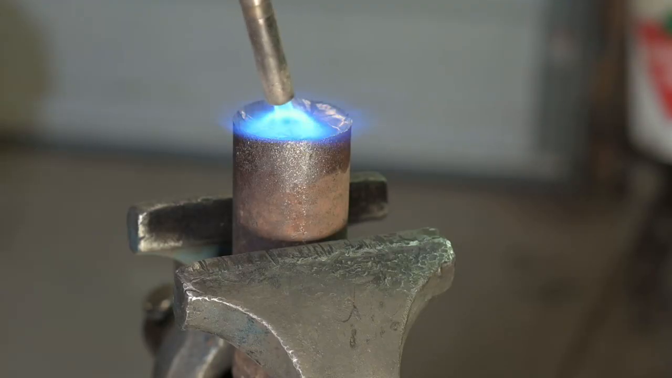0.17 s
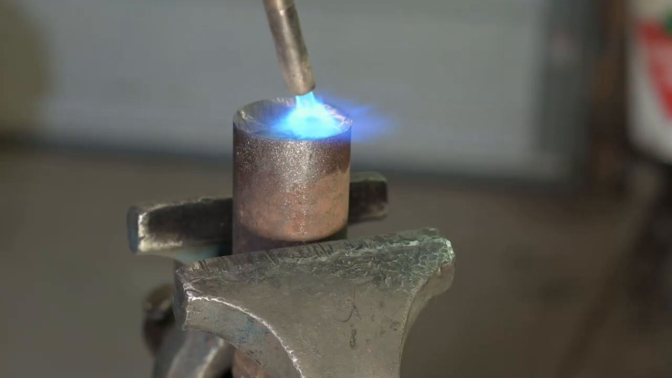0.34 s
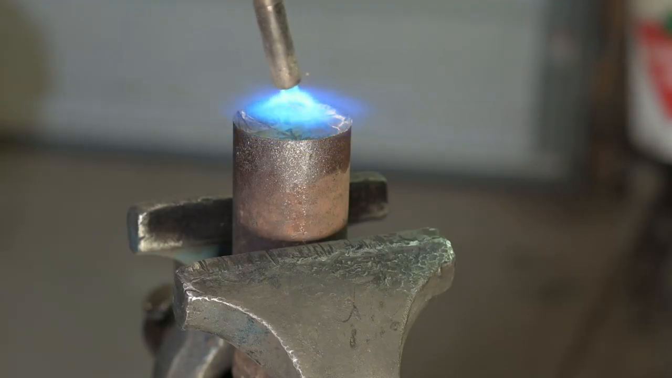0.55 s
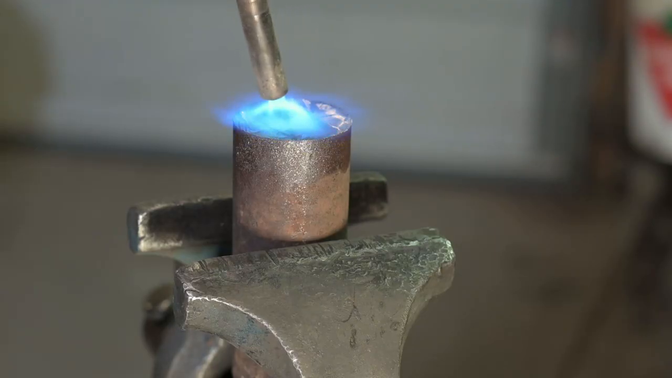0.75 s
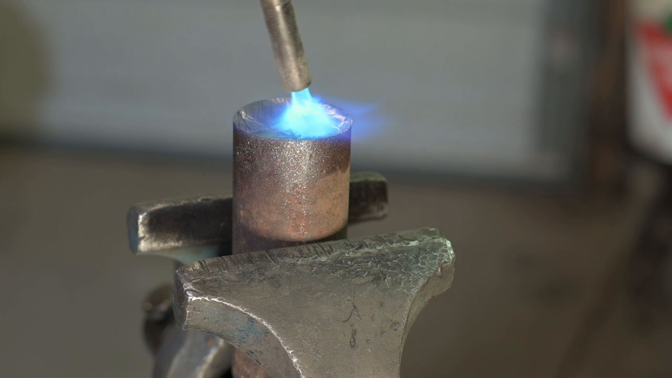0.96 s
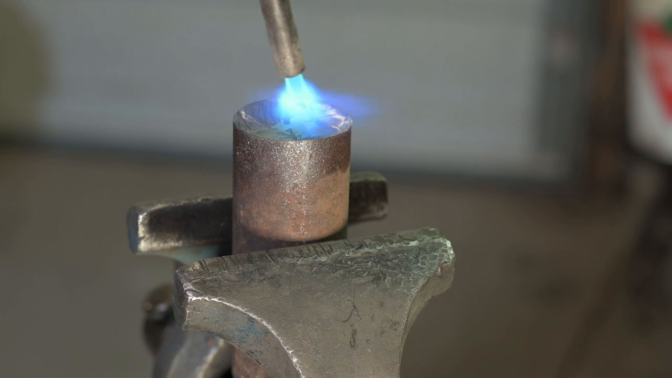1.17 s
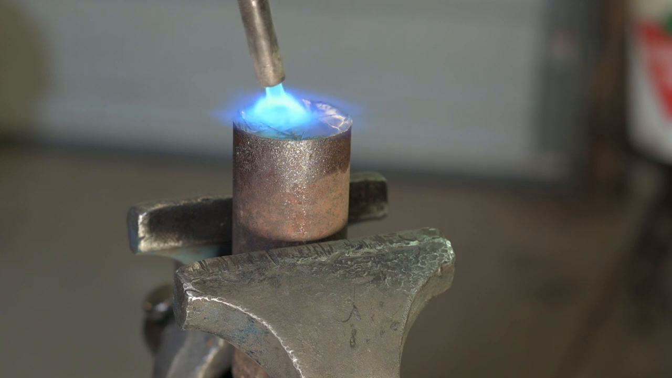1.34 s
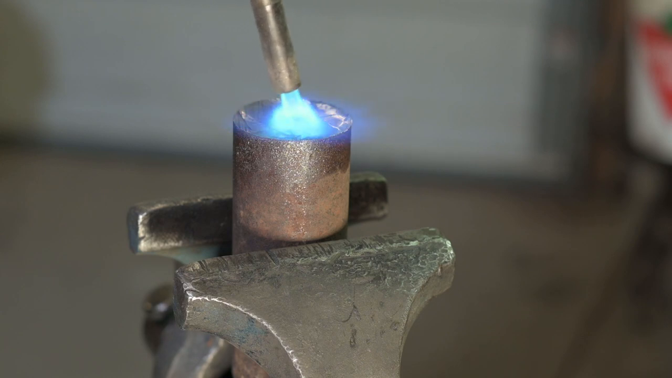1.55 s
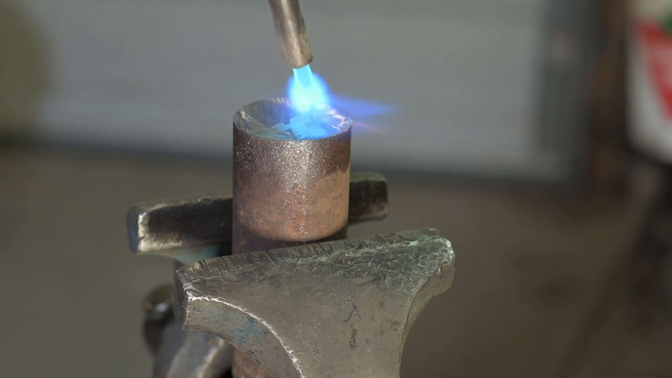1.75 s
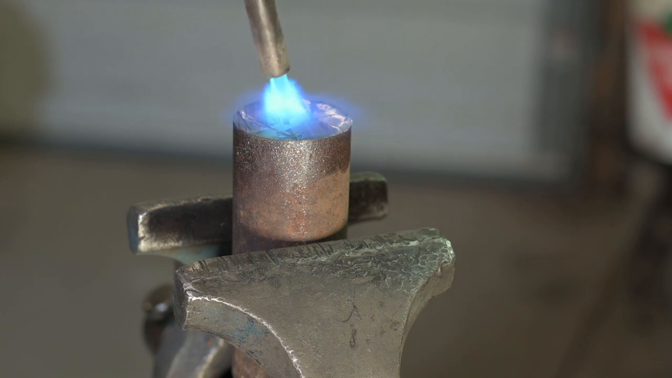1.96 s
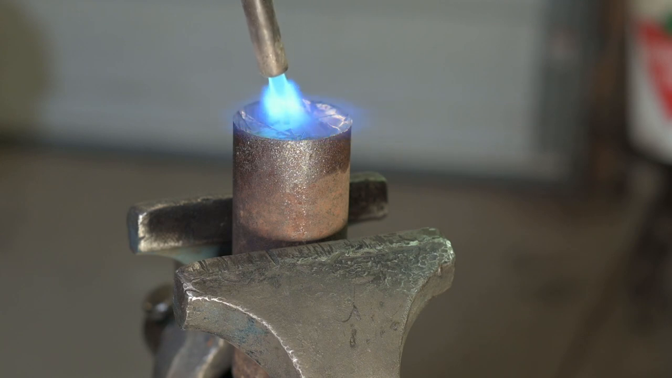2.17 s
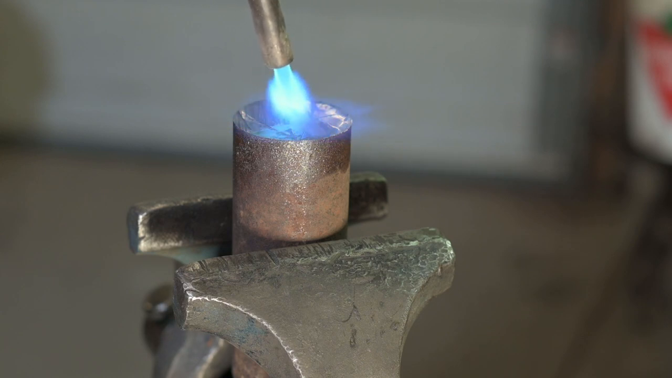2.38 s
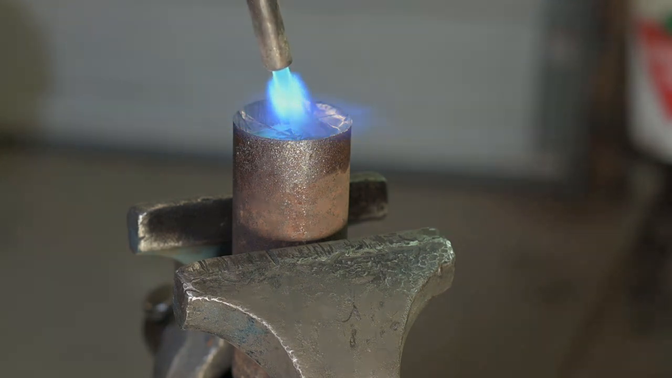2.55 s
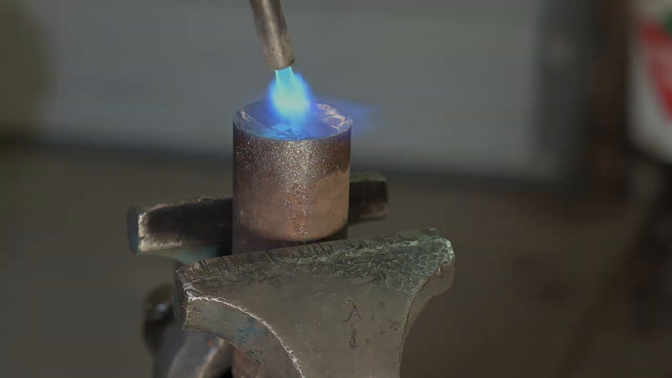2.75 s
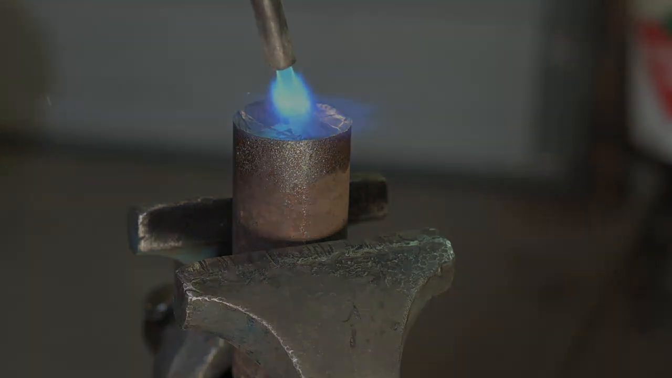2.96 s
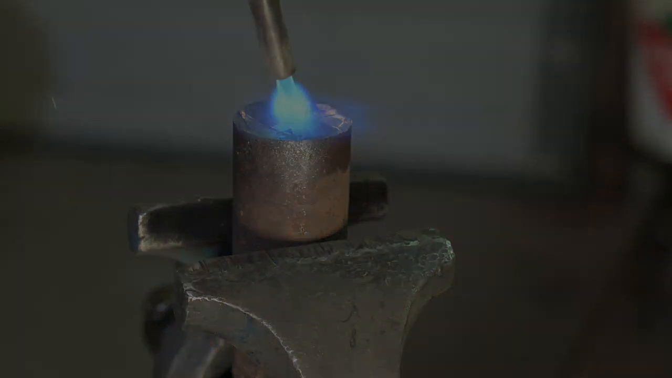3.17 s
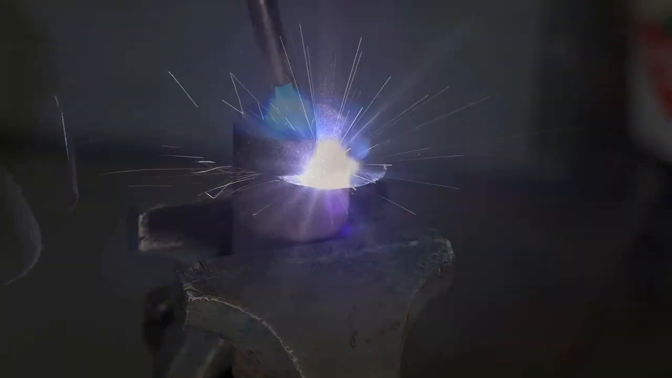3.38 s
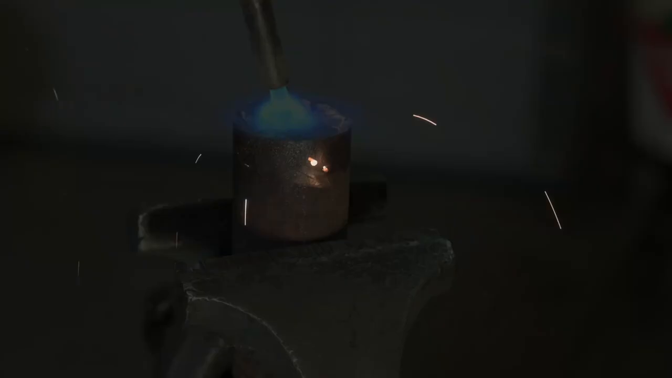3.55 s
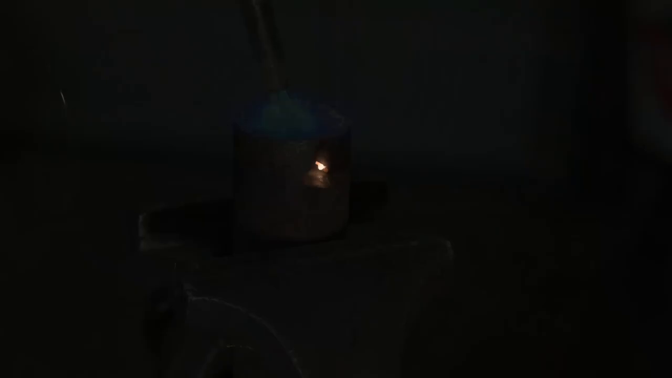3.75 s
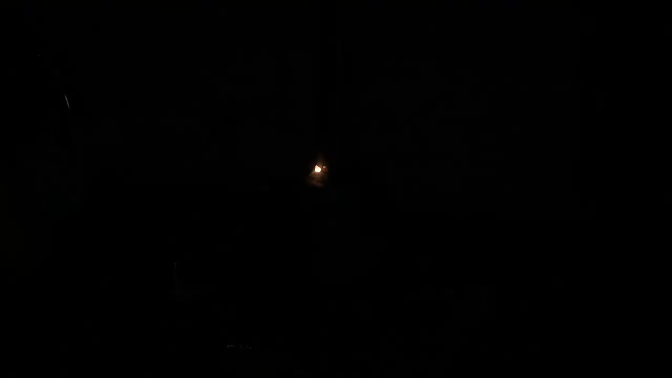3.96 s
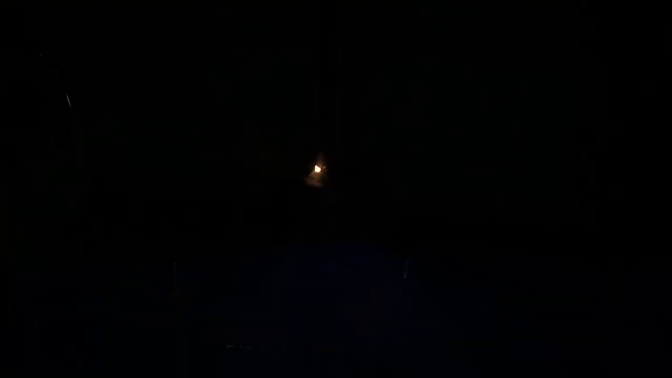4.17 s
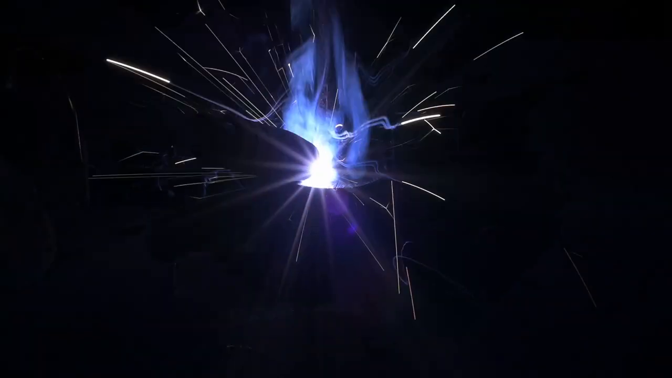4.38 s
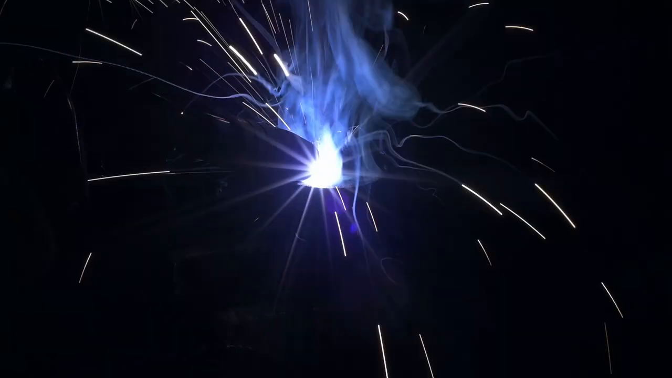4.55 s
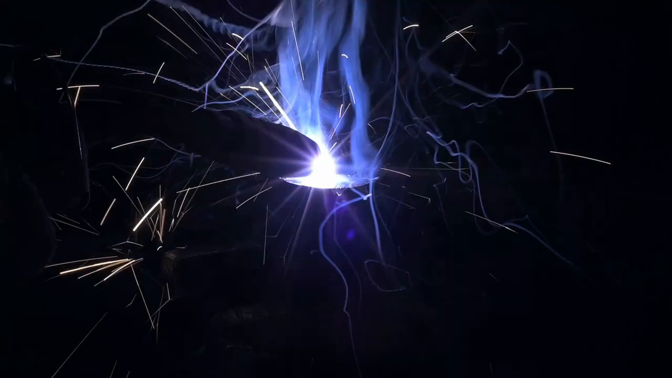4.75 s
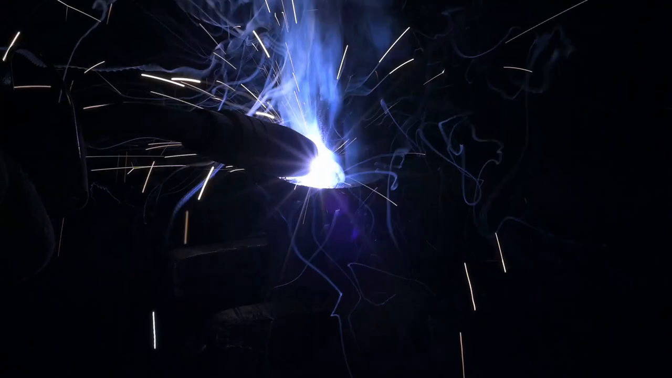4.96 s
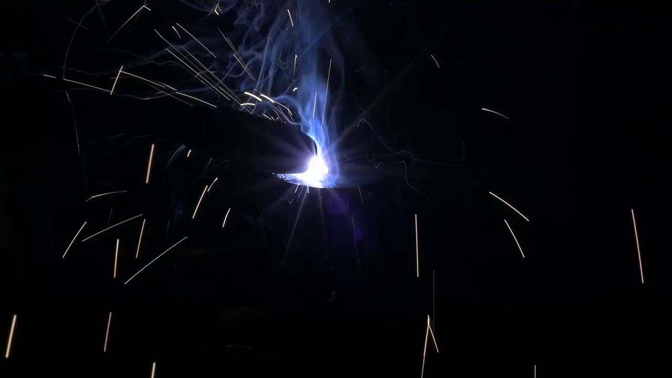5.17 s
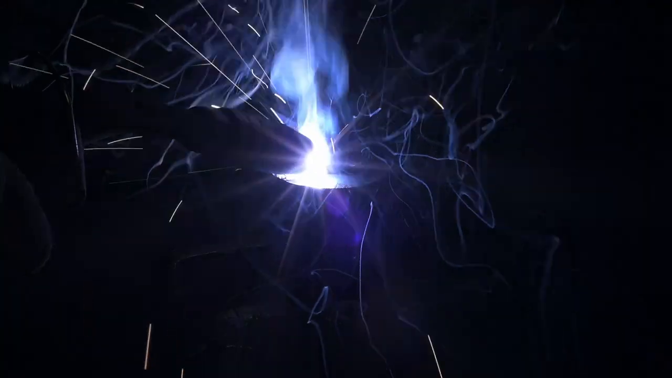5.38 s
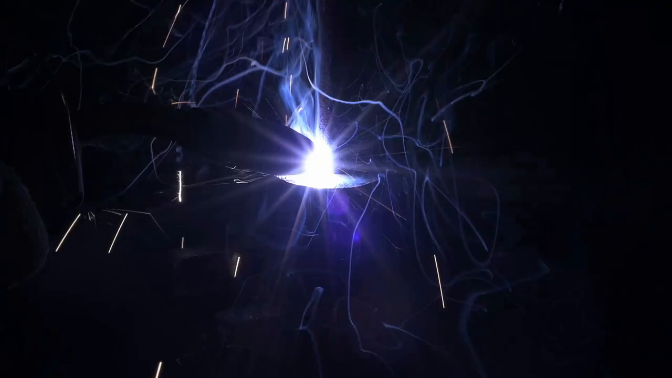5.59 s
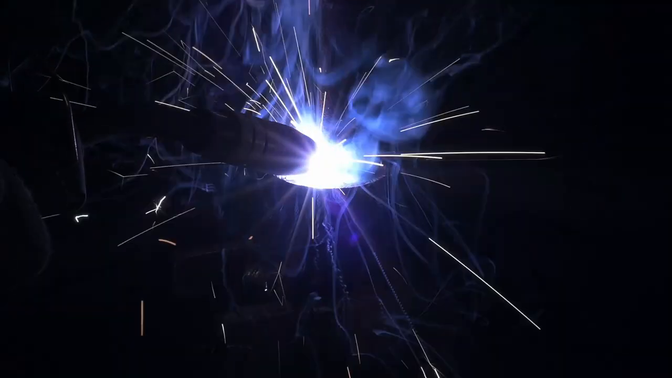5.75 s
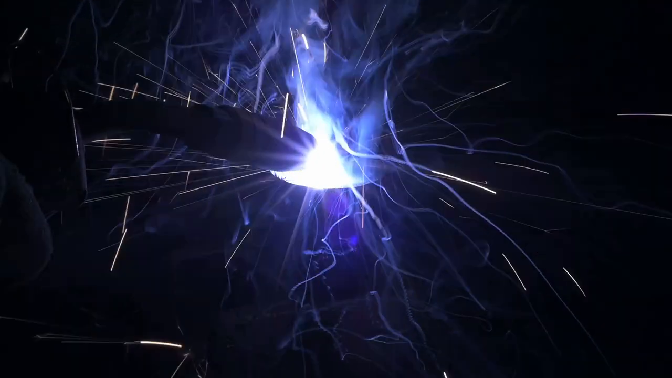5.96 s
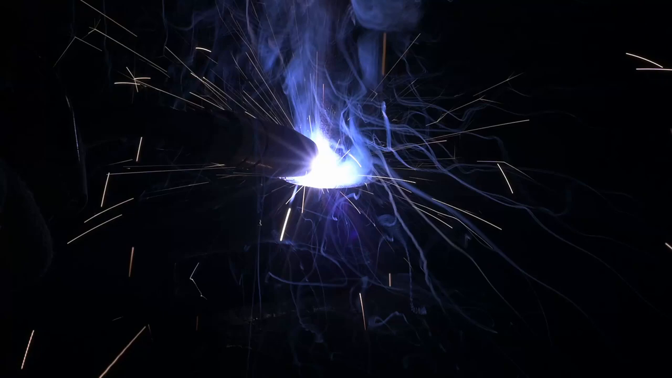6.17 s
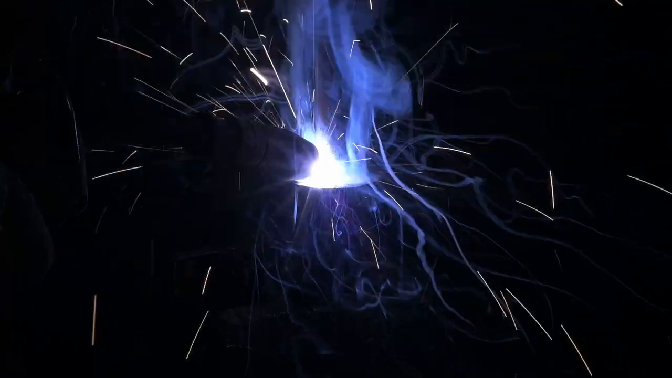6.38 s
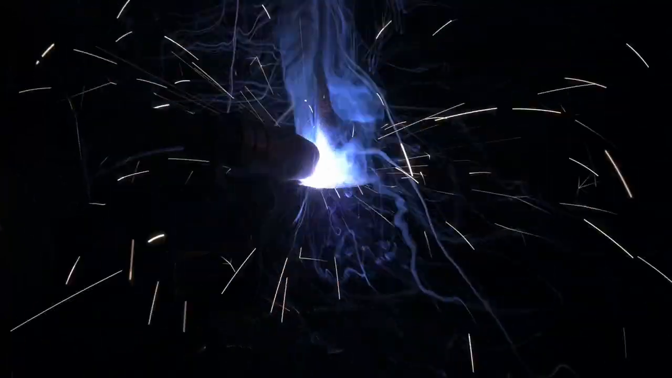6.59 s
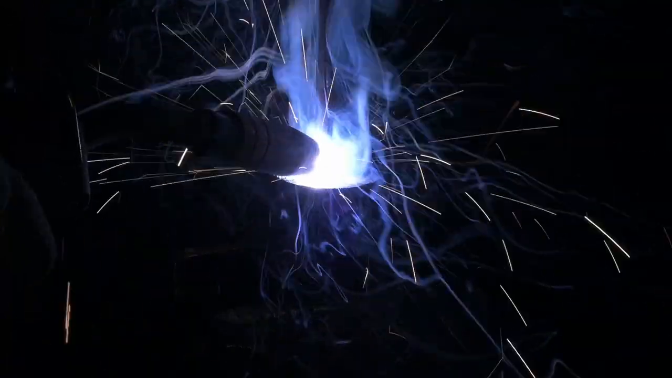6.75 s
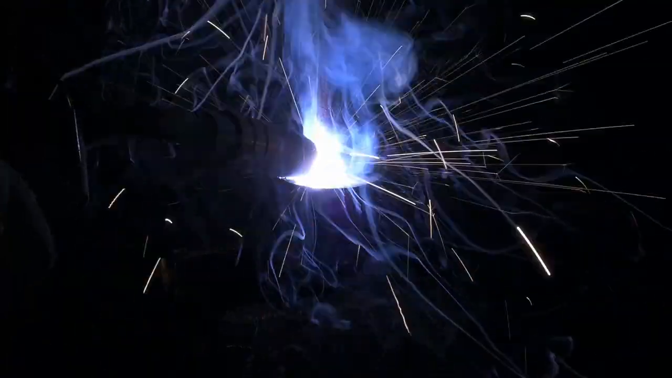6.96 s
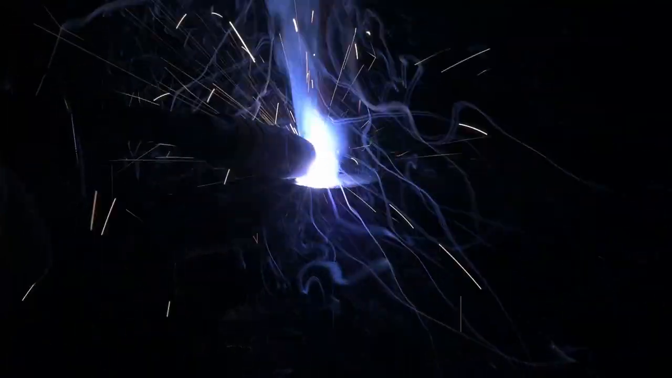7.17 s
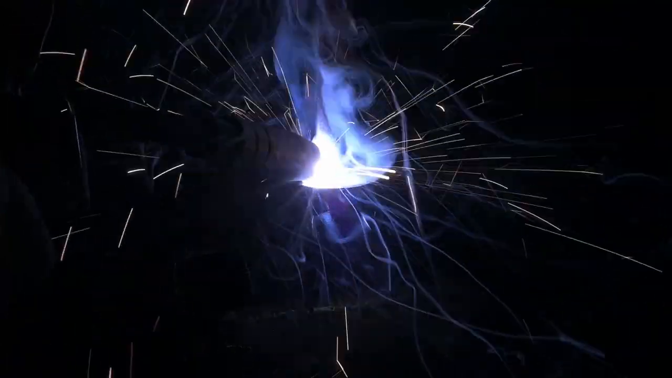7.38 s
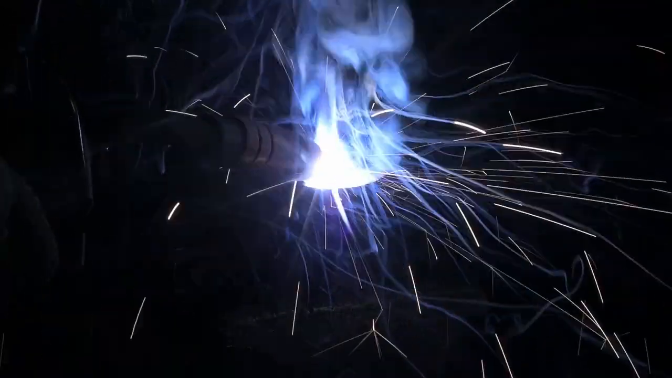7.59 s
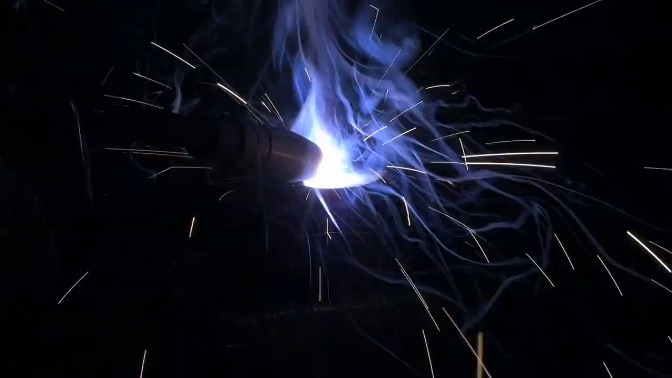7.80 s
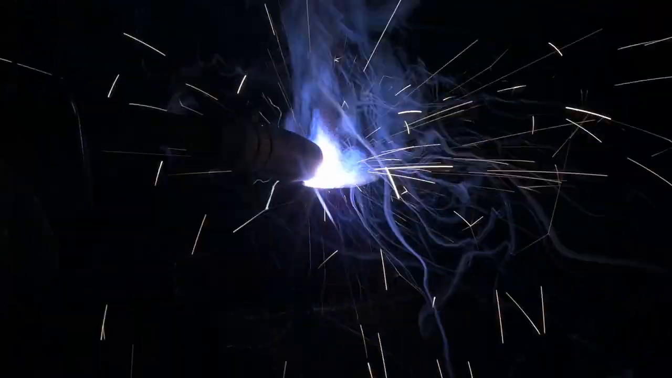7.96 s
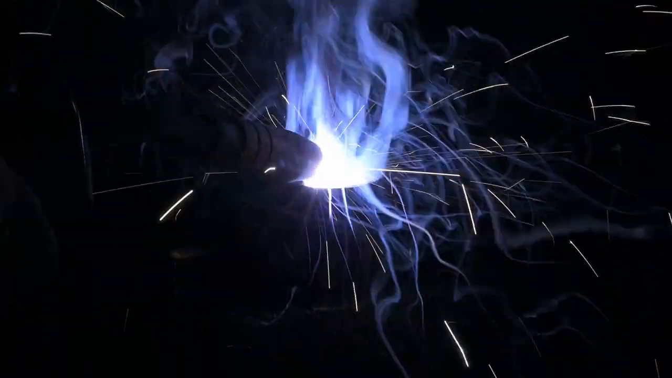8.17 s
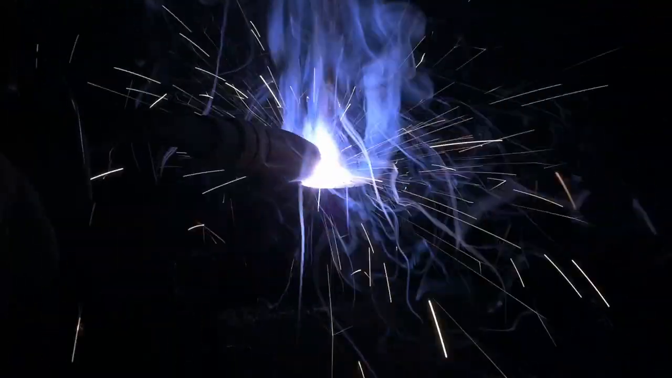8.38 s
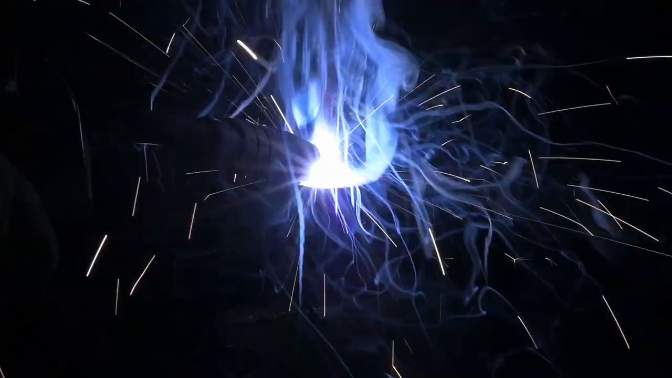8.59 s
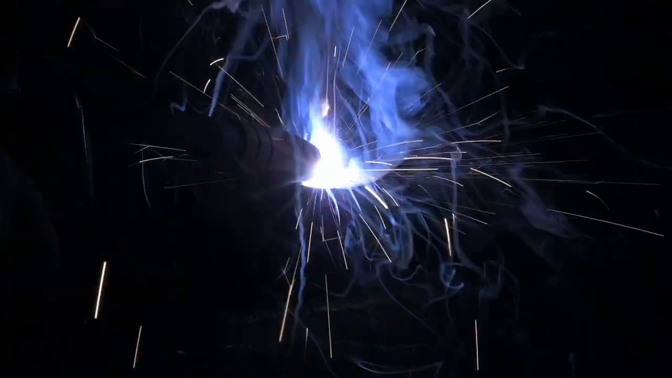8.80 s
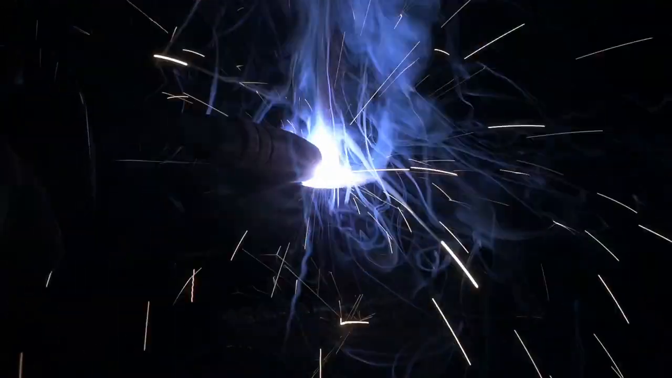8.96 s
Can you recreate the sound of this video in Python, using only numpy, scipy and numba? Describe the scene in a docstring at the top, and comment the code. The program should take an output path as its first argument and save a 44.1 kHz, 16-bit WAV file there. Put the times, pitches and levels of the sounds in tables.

```python
"""A gas torch plays on the end of a steel bar in a vice: noise roar and hiss with a hollow jet note.
The note locks at the rim of the bar, swells with brief whistles as the torch lifts, then all fades.
After a thin spit in the flame and a faint knock, a welding arc strikes, cracks with the mains and dies.
The electrode chatters on the steel (decaying modes) and relights the arc, which burns on in flares.
Both sound close, with delayed repeats and short reverberation over faint workshop air."""
import sys
import numpy as np
from scipy import signal
from scipy.fft import rfft, irfft, next_fast_len
from scipy.io import wavfile
from scipy.ndimage import minimum_filter1d, map_coordinates
from numba import njit

SR = 44100
rng = np.random.default_rng(int(sys.argv[2]) if len(sys.argv) > 2 else 0)


def wav_record(signal):
    """Record a signal, one row per channel, as 16-bit PCM in the file named by sys.argv[1]."""
    frames = np.transpose(np.atleast_2d(signal))
    bounded = np.clip(frames, -1, 1)
    # unit amplitude maps onto the largest positive 16-bit level
    quanta = np.round(bounded * 32767).astype(np.int16)
    wavfile.write(sys.argv[1], SR, quanta)


N = 398223
TIME = np.arange(N) / SR

# Workshop wash. Each row: frequency in Hz, relative density in dB per Hz.
AIR_SPECTRUM = [(30, -16.5), (70, -22.5), (120, -14), (170, -0.5), (290, 1.5), (450, -2.5), (700, -7.5),
                (1500, -14.5), (3700, -21.5), (7000, -33), (14000, -47)]
AIR_DB = -70
# Faint tones of the workshop. Each row: frequency in Hz, mean level in dB.
DRONE_TONES = [(161.5, -84), (360.7, -82.5), (570.6, -79)]
# Colour of the reverberation. Each row: frequency in Hz, gain in dB.
WORKSHOP_SPECTRUM = [(60, 2), (170, 7), (290, 2), (500, 1), (900, 4.5), (1500, 3), (3500, 4), (6000, -1.5),
                     (10000, -6.5), (16000, -10)]

# Burning eddies. Each row: frequency in Hz, relative density in dB per Hz.
ROAR_SPECTRUM = [(25, -35), (75, -42.5), (110, -23), (145, -19.5), (185, -8), (215, -7), (260, -6),
                 (330, 1.5), (385, -4.5), (430, 2), (620, 1), (900, -1), (1150, 5.5), (1500, -8.5),
                 (4000, -39)]
# Gas leaving the nozzle. Each row: frequency in Hz, relative density in dB per Hz.
HISS_SPECTRUM = [(400, -38), (1450, -12), (1720, 6), (2080, -4), (2400, 0), (2600, -4.5), (3050, -2.5),
                 (3900, -5), (4200, -9), (5200, -7), (6600, -16), (7800, -22), (11000, -72.5)]
# Thin top hiss. Each row: frequency in Hz, relative density in dB per Hz.
TOP_HISS_SPECTRUM = [(5000, -11), (8000, 8.5), (10000, 8.5), (12500, 3.5), (13500, 2.5), (16000, -23.5)]
# Top hiss over time. Each row: time in seconds, level in dB.
TOP_HISS_LEVEL = [(0.0, -49.5), (0.99, -46), (1.1, -51), (1.4, -46), (2.02, -50), (2.07, -46.5),
                  (2.59, -51), (2.66, -50), (2.79, -53.5), (2.95, -48), (3.0, -54), (3.33, -47)]
# Resonances of nozzle and flame. Each row: frequency in Hz, width in Hz, level in dB before a band-pass.
NOZZLE_MODES = [(302, 14, -43), (575, 40, -39.8), (640, 35, -40), (790, 45, -37.8), (1135, 35, -37.5),
                (1204, 16, -39.5), (1252, 20, -37.5), (1391, 40, -41.3), (1595, 50, -43.3),
                (1768, 25, -41.3), (2220, 40, -44.3), (3045, 70, -46.3), (4550, 250, -46.3)]
# Height of the torch above the steel. Each row: time in seconds, lift from 0 to 1.
TORCH_LIFT = [(0, 0.08), (1.0, 0.16), (1.58, 0.26), (1.79, 1), (2.7, 1), (3.3, 1), (3.45, 0.35)]
# Levels with the torch close, and their change at full lift
ROAR_DB, ROAR_LIFT_DB = -25, -1.5
HISS_DB, HISS_LIFT_DB = -27.5, -1.63
JET_DB, JET_LIFT_DB = -41.5, 13.5
JET_HZ, JET_WIDTH_HZ = 1250, 200
# The jet crosses the rim of the bar
LOCK_S, LOCK_LENGTH_S = .72, 0.2
LOCK_HZ, LOCK_WIDTH_HZ, LOCK_RISE_DB, LOCK_ROAR_DB = 1392, 45, 7, -4
# Brief jet whistles. Each row: centre in seconds, length in seconds, pitch in Hz, peak level in dB.
JET_WHISTLES = [(0.854, .05, 1255, -33), (1.13, 0.051, 1283, -26), (1.56, .04, 1130, -24),
                (1.783, .05, 1205, -26.5), (1.853, .06, 1280, -25), (2.163, .07, 1200, -31),
                (2.227, .05, 1255, -30.5), (2.36, 0.13, 1258, -35), (2.435, 0.044, 1150, -21),
                (2.607, 0.03, 1248, -28.5), (2.73, 0.11, 1207, -25.5), (3.17, .045, 1255, -27)]
# Torch reflections off the bench. Each row: delay in ms, gain.
TORCH_ECHOES = [(1.36, .17)]
FADE_START_S, FADE_END_S = 3.226, 3.923
SPIT_S, SPIT_FIZZ_DB, SPIT_DECAY_S = 3.4314, -28, 0.00092

# Electrode on steel. Each row: time in seconds, level in dB, pitch ratio, ring length ratio,
# brightness in dB per octave about 3 kHz.
TAPS = [(4.092, -72, .935, 2.0, -6), (5.6453, -42, 1.04, 0.73, 0.5), (5.6485, -41, 1.004, 0.61, 0),
        (5.657, -42, 1.2, .7, 1), (5.669, -49, 1.1, 0.5, 0), (5.6877, -53, 1, .5, -3)]
# Ring of the work. Each row: frequency in Hz, level in dB, t60 in seconds.
STEEL_MODES = [(1430, 0, .05), (1880, -19, .1), (2200, 1.5, 0.07), (2750, -7, .08), (3300, 3, .04),
               (3440, -1, 0.039), (3837, 5, .04), (4000, -4, .03), (4800, 2, .045), (5440, 1, .045),
               (6170, 1, .04), (7000, -9, .035), (8516, -7, .04), (9800, 7, .04)]

MAINS_HZ = 60.05
# Burning stretches. Each row: start in seconds, end in seconds, initial gain in dB, sag in dB per second,
# treble tilt in dB (half of it per factor e above 3 kHz).
BURNS = [(4.216, 4.376, -48, -8, -3.5), (4.365, 5.273, -37, 18, 0.5), (5.304, 5.53, -55, -17, -2),
         (5.55, 5.63, -66.5, 12, -10), (5.626, 5.69, -51, 150, -7), (5.753, 9.1, -42.5, 0, -0.5)]
ARC_ATTACK_S, ARC_RELEASE_S = 0.0095, 0.014
# Flares and falters. Each row: centre in seconds, length in seconds, crackle change in dB,
# treble tilt change in dB (scaled as in BURNS), plume change in dB.
FLARES = [(4.3, 0.11, -17, 7, 30), (4.457, 0.3, 8, -0.5, 0), (4.62, 0.078, -4.5, 0, 16),
          (4.89, 0.18, 9, -2.5, 5), (5.094, 0.13, 8.5, 1, 5), (5.775, 0.11, 6.5, -6, 6),
          (5.872, 0.097, -1, 6, 5), (5.965, 0.039, -6.5, 2, -3), (6.02, 0.053, 6, 3, 0),
          (6.137, 0.055, 1.5, -2, -6), (6.228, 0.1, 8, -8, -4), (6.346, 0.082, 6, 0, 0),
          (6.553, .06, 3.5, -1, -3), (6.685, 0.066, 6, -1, 3), (6.827, 0.081, 8, -7, 2.5),
          (7.01, 0.068, 5, -4, 5), (7.095, 0.088, -4.5, 0, 8), (7.168, 0.05, 5.5, -1, -2),
          (7.427, 0.13, 7, -0.5, -4), (7.58, 0.025, 3.5, 10, 2), (7.712, .06, 2, -1, 12.5),
          (7.76, 0.054, -2.5, -1, 8), (7.868, 0.076, 4.5, 0, -1), (7.987, 0.1, 9, -3.5, -2),
          (8.1, 0.029, 6, 7, 3), (8.228, 0.089, 2.5, 2, -9), (8.354, 0.039, 6, -3, -8),
          (8.508, 0.089, 5.5, -3, -5), (8.628, 0.041, -12, 5, 4), (8.885, 0.14, -2, 5, 15)]
# Metal drops short the arc and burst. Each row: time in seconds, level in dB.
SNAPS = [(4.2419, -3.5), (4.3016, 1.5), (4.39, -7), (4.3985, -8), (4.4057, -7), (4.423, -4.5), (4.432, -7),
         (4.441, -4), (4.449, -16), (4.4574, -12), (4.465, -17), (4.4717, -19), (4.4902, -9), (4.5006, -6),
         (4.5254, -13), (4.5313, -4.5), (4.5404, -14), (4.5656, -11.5), (4.5901, -9.5), (4.615, -10.5),
         (4.619, -12), (4.6244, -7), (4.639, -9.5), (4.641, -8), (4.648, -4.5), (4.691, -14.5),
         (4.714, -11.5), (4.7226, -11.5), (4.7419, -13), (4.7825, -20), (4.7913, -15), (4.8154, -15),
         (4.8321, -5.5), (4.8471, -11), (4.8568, -8), (4.88, -15), (4.9326, -11), (4.9891, -16),
         (5.0314, -18), (5.0385, -19), (5.0815, -19), (5.0894, -15), (5.1303, -17.5), (5.1886, -23),
         (5.2079, -16.5), (5.2393, -18.5), (5.2563, -24), (5.2735, -20.5), (5.316, -10), (5.349, -24),
         (5.393, -22.5), (5.44, -24.5), (5.4573, -26), (5.4742, -28), (5.6468, -10), (5.657, -16),
         (5.665, -17), (5.67, -14), (5.687, -18), (5.7423, -10.5), (5.7644, -6.5), (5.7905, -13),
         (5.84, -15.1), (5.8477, -13), (5.857, -12), (5.8737, -10), (5.888, -18), (5.9052, -16.5),
         (5.9138, -18), (6.0065, -13.5), (6.0137, -4.5), (6.031, -18), (6.0533, -16), (6.0815, -17),
         (6.1382, -18), (6.1496, -14.5), (6.1725, -13), (6.1809, -11.5), (6.2228, -8.5), (6.2317, -13),
         (6.2383, -14), (6.248, -6.5), (6.2975, -18), (6.3121, -14), (6.3233, -16), (6.331, -9.5),
         (6.3401, -13), (6.4226, -18), (6.4392, -15), (6.5151, -17.5), (6.54, -12), (6.6074, -13.5),
         (6.623, -15), (6.6307, -16), (6.647, -17), (6.7897, -15), (6.7968, -15), (6.8066, -17),
         (6.8392, -15), (6.8466, -10.5), (6.9315, -13.5), (6.9568, -16), (6.9735, -18), (7.0146, -15.5),
         (7.147, -14.5), (7.1621, -14), (7.2217, -13), (7.239, -17), (7.2984, -19), (7.3873, -11),
         (7.4307, -15), (7.4382, -11), (7.463, -10.5), (7.4724, -9.5), (7.4965, -13.5), (7.6711, -16.5),
         (7.7551, -18), (7.7965, -15), (7.8467, -20), (7.8614, -19), (7.871, -18), (7.8861, -14),
         (7.9218, -16), (7.9462, -14.2), (7.9707, -17), (7.9878, -6), (8.0032, -15), (8.0137, -13),
         (8.0228, -16), (8.0287, -14.3), (8.046, -14), (8.0555, -15), (8.072, -13), (8.0965, -13.5),
         (8.1047, -12.5), (8.1211, -18), (8.145, -19), (8.1712, -10.5), (8.1794, -8.5), (8.2056, -13.5),
         (8.2718, -16.5), (8.3208, -13), (8.3401, -16), (8.346, -18), (8.3795, -14), (8.4368, -17),
         (8.4624, -14.5), (8.4865, -15), (8.513, -14), (8.5197, -15), (8.5378, -16), (8.5467, -15.5),
         (8.5876, -15), (8.6282, -17), (8.663, -16.5), (8.837, -16), (8.8542, -14), (8.879, -11.5),
         (8.889, -14), (8.8956, -10.5), (8.913, -10)]
# Pressure pulse of one spark. Each row: frequency in Hz, relative level in dB.
SPARK_SPECTRUM = [(30, -29), (100, -32.5), (250, -10), (500, -7.5), (780, -3.5), (900, -12), (1020, -2.5),
                  (1160, -2), (1380, 3), (1780, 3), (2080, -2.5), (2600, 0), (2900, -3.5), (3400, 2.5),
                  (3950, 3), (4200, -2), (4500, 3), (5300, 4), (6100, 3.5), (6800, 2), (7400, -3),
                  (8300, -2), (9700, 1), (12200, -4.5), (16000, -7)]
# Notch of the flux cup at the rod's tip; wander is a share of the pitch
CUP_HZ, CUP_WIDTH_HZ, CUP_DEPTH, CUP_GROWTH_S, CUP_WANDER = 7440, 1180, .6, .5, .025
# Faint delayed repeats of the arc's crackle. Each row: mean delay in ms, gain.
ARC_REPEATS = [(.56, .16), (1.33, .2), (1.76, .13), (7.2, .04), (16.6, .07)]
# Hot gas around the arc. Each row: frequency in Hz, relative density in dB per Hz.
PLUME_SPECTRUM = [(25, -40.5), (100, -34), (170, -17), (280, 7), (420, 2), (750, 0), (950, -9.5),
                  (2500, -11.5)]
PLUME_DB = -22  # against the arc's gain
# Welder hum under load. Each row: multiple of the mains frequency, mean level in dB.
HUM_LINES = [(2, -81.5), (4, -70.5), (6, -79)]
TOP_HZ = 16000


def undb(db):
    """Decibels to gain."""
    return 10 ** (np.asarray(db) / 20)


def unit(x):
    """Scale to rms 1."""
    return x / np.sqrt(np.mean(x ** 2))


def curves(table):
    """The columns of a time table, one value a sample."""
    s, *columns = np.transpose(table)
    return [np.interp(TIME, s, c) for c in columns]


def gains(points, size):
    """Gain of a (Hz, dB) spectrum at each bin of a transform."""
    hz, db = np.transpose(points)
    bin_hz = np.arange(size // 2 + 1) * SR / size
    return undb(np.interp(np.log(bin_hz + 1), np.log(hz), db))


def colour(x, points):
    """Filter by a (Hz, dB) spectrum."""
    size = next_fast_len(len(x), True)
    return irfft(rfft(x, size) * gains(points, size), size)[:len(x)]


def butter(x, order, hz, kind):
    """Causal Butterworth filter."""
    return signal.sosfilt(signal.butter(order, hz, kind, fs=SR, output="sos"), x)


def pulse_shape(points, size=1024):
    """Minimum-phase pulse with this spectrum, peak 1: energy as early as causality allows."""
    cepstrum = irfft(np.log(gains(points, size)))
    cepstrum[1:size // 2] *= 2
    cepstrum[size // 2 + 1:] = 0
    pulse = irfft(np.exp(rfft(cepstrum)))
    return pulse / np.abs(pulse).max()


def noise():
    """White noise."""
    return rng.standard_normal(N)


def walk(rate_hz):
    """Random drift, spread near 1: lines between normal draws at this rate."""
    return np.interp(TIME * rate_hz, np.arange(N), noise())


def swell(s, length_s):
    """Smooth rise and fall about s, peak 1, with this length at half height."""
    return np.exp2(-np.minimum((2 * (TIME - s) / length_s) ** 2, 20))


def impulses(times_s, sizes):
    """A train of single-sample kicks."""
    index = np.clip(np.round(times_s * SR).astype(int), 0, N)
    return np.bincount(index, sizes, N + 1)[:N]


def convolve(x, response):
    """Pass a sound through an impulse response."""
    return signal.oaconvolve(x, response)[:N]


@njit
def resonate(x, hz, width_hz):
    """State-variable band-pass whose centre and width may move."""
    y, band, low = np.empty(len(x)), 0., 0.
    for i in range(len(x)):
        g, k = np.tan(np.pi * hz[i] / SR), width_hz[i] / hz[i]
        v = (band + g * (x[i] - low)) / (1 + g * (g + k))
        band, low, y[i] = 2 * v - band, low + 2 * g * v, k * v
    return y


def workshop(echoes, wet_db, early_db, t60_s=0.47, early_t60_s=0.0061, gap_s=0.0022):
    """Response of the place: direct sound, any listed echoes, scatter off the vice, the room's tail."""
    t = TIME[:SR // 2]
    tail = colour(rng.standard_normal(len(t)), WORKSHOP_SPECTRUM) * undb(-60 * t / t60_s) * (t > gap_s)
    scatter = rng.standard_normal(len(t)) * undb(-60 * t / early_t60_s) * np.minimum(t / gap_s, 1)
    response = undb(wet_db) * tail / np.linalg.norm(tail)
    response += undb(early_db) * scatter / np.linalg.norm(scatter)
    response[0] += 1
    for ms, gain in echoes:
        response[int(ms * SR / 1000)] += gain
    return response


def air():
    """The quiet workshop: a low noise wash with faint, wavering tones."""
    tones = 0
    for hz, db in DRONE_TONES:
        phase = 2 * np.pi * hz * TIME + .5 * walk(10)
        tones = tones + np.sqrt(2) * undb(db + 2 * walk(8)) * np.sin(phase)
    return unit(colour(noise(), AIR_SPECTRUM)) * undb(AIR_DB + .8 * walk(6)) + tones


def torch():
    """Burning eddies roar, gas hisses from the nozzle, and the jet sings where it meets the steel."""
    lift, = curves(TORCH_LIFT)
    lock = swell(LOCK_S, LOCK_LENGTH_S)
    lock_roar_db = LOCK_ROAR_DB * lock ** 2
    flame = flame_noise(lift, lock_roar_db) + nozzle_rings(lock_roar_db)
    jet = jet_note(lift, lock) + edge_tone(lift) + rim_whistle() + whistles()
    place = workshop(TORCH_ECHOES, wet_db=-15, early_db=-26)
    fade = np.clip((FADE_END_S - TIME) / (FADE_END_S - FADE_START_S), 0, 1)
    return convolve(flame + jet, place / np.linalg.norm(place)) * fade


def flame_noise(lift, lock_roar_db):
    """Turbulent noise in three bands, all swayed by the same eddies."""
    top_db, = curves(TOP_HISS_LEVEL)
    eddies = walk(70)
    roar_db = ROAR_DB + ROAR_LIFT_DB * lift + lock_roar_db + 1.37 * eddies + 0.85 * walk(17)
    hiss_db = HISS_DB + HISS_LIFT_DB * lift + .5 * eddies + 1.2 * walk(400)
    top_db = top_db + .5 * eddies + 1.3 * walk(40)
    roar = unit(colour(noise(), ROAR_SPECTRUM)) * undb(roar_db)
    hiss = unit(colour(noise(), HISS_SPECTRUM)) * undb(hiss_db)
    return roar + hiss + unit(colour(noise(), TOP_HISS_SPECTRUM)) * undb(top_db)


def nozzle_rings(lock_roar_db):
    """Noise excites narrow resonances of nozzle and flame."""
    rings = 0
    for hz, width_hz, db in NOZZLE_MODES:
        ring = resonate(noise(), np.full(N, float(hz)), np.full(N, float(width_hz)))
        rings = rings + undb(db) * unit(ring)
    return butter(rings, 3, [230, 5800], "band") * undb(lock_roar_db)


def jet_note(lift, lock):
    """Resonant noise of the jet on the steel; as it locks at the rim it climbs, narrows and grows."""
    hz = JET_HZ + (LOCK_HZ - JET_HZ) * lock ** 2
    width_hz = JET_WIDTH_HZ * (LOCK_WIDTH_HZ / JET_WIDTH_HZ) ** lock
    level_db = JET_DB + JET_LIFT_DB * lift + LOCK_RISE_DB * lock + 1.9 * walk(25)
    wandering_hz = hz * (1 + width_hz / 8000 * walk(22))
    # dividing by the root of the width keeps the power steady as it narrows
    note = resonate(noise() / np.sqrt(width_hz), wandering_hz, width_hz)
    return unit(resonate(note, hz, np.full(N, 500.))) * undb(level_db)


def edge_tone(lift, tone_db=-33.5, waver=.036, waver_db=2.5):
    """A wavering tone through the jet note, its amplitude proportional to lift."""
    phase = 2 * np.pi * np.cumsum(JET_HZ * (1 + waver * walk(50))) / SR
    return np.sqrt(2) * np.sin(phase) * lift * undb(tone_db + waver_db * walk(25))


def rim_whistle(tone_db=-26.5, top_hz=1400, length_s=.21, waver=.006, waver_db=1.5):
    """As the jet crosses the rim of the bar, one whistle glides up and back down."""
    near = swell(LOCK_S, length_s)
    hz = (JET_HZ + (top_hz - JET_HZ) * np.sin(np.pi / 2 * near)) * (1 + waver * walk(60))
    tone = np.sqrt(2) * np.sin(2 * np.pi * np.cumsum(hz) / SR)
    return tone * near * undb(tone_db + waver_db * walk(40))


def whistles(waver_db=0.5, waver_samples=0.0052):
    """Now and then the jet settles briefly into a near-pure note, its timing slightly wobbling."""
    tones = 0
    for s, length_s, hz, db in JET_WHISTLES:
        tones = tones + undb(db) * swell(s, length_s) * np.sin(2 * np.pi * hz * TIME)
    wobble = np.cumsum(waver_samples * walk(67))
    wobbled = np.interp(np.arange(N) + wobble, np.arange(N), tones)
    return np.sqrt(2) * wobbled * undb(waver_db * walk(56))


def spit(tick_db=-8.0):
    """One sharp, thin tick in the flame, with a tiny decaying fizz after it."""
    fizz = noise() * np.exp(-np.abs(TIME - SPIT_S) / SPIT_DECAY_S) * (TIME > SPIT_S)
    tick = impulses(np.array([SPIT_S]), undb([tick_db]))
    return butter(tick + undb(SPIT_FIZZ_DB) * fizz, 2, 4500, "high")


def welding(burning, treble_db, roam_ms=0.053, count=4):
    """The arc roams along the seam: delayed repeats shift and the scatter off the vice keeps changing."""
    source = taps() + arc(burning, treble_db)
    repeats = 0
    for ms, gain in ARC_REPEATS:
        delay_s = (ms + roam_ms * walk(6)) / 1000
        repeats = repeats + gain * map_coordinates(source, [(TIME - delay_s) * SR], order=3)
    # crossfade at random between several responses of the place
    places = [workshop([], wet_db=-9.2, early_db=-11, t60_s=0.2) for _ in range(count)]
    spots = np.array([convolve(source, place) for place in places])
    nearness = np.exp(2 * np.array([walk(12) for _ in range(count)]))
    return repeats + np.sum(nearness * spots, axis=0) / nearness.sum(axis=0)


def taps(scrape_db=6, scrape_t60_s=0.031):
    """The electrode touches the steel: a noise scrape and decaying modes, which depend on the contact."""
    t, out = TIME[:SR // 2], 0
    for s, level_db, pitch, length, bright_db in TAPS:
        ring = 0
        for hz, db, t60_s in STEEL_MODES:
            mode_db = db + bright_db * np.log2(hz / 3000) - 60 * t / (t60_s * length)
            ring = ring + undb(mode_db) * np.cos(2 * np.pi * hz * pitch * t)
        scrape = rng.standard_normal(len(t)) * undb(scrape_db - 60 * t / scrape_t60_s)
        out = out + convolve(impulses(np.array([s]), undb([level_db])), ring + scrape)
    return butter(out, 2, [600, 9000], "band")


def arc_state(unrest_db=-0.1, treble_unrest_db=0.0):
    """Burns catch, sag or grow, and go out, with flares: arc gain, treble tilt (dB), plume rise (dB)."""
    burning, treble_db = 0, treble_unrest_db * walk(60)
    for start_s, end_s, db, sag_db_per_s, tilt_db in BURNS:
        attack = (TIME - start_s) / ARC_ATTACK_S
        release = 1 + (end_s - TIME) / ARC_RELEASE_S
        gate = np.clip(np.minimum(attack, release), 0, 1)
        burnt_s = np.clip(TIME - start_s, 0, end_s - start_s)
        burning = burning + gate * undb(db - sag_db_per_s * burnt_s)
        treble_db = treble_db + gate * tilt_db
    flares = np.array(FLARES)
    swells = np.array([swell(s, length_s) for s, length_s in flares[:, :2]])
    rise_db, flare_treble_db, puff_db = flares[:, 2:].T @ swells
    return burning * undb(rise_db + unrest_db * walk(24)), treble_db + flare_treble_db, puff_db


def arc(burning, treble_db, crest=.35, jitter=.125, sputter_db=-2, crack_db=18, scatter_db=6,
        ceiling_db=-20, split_db=-14, count=13000):
    """Current peaks twice a mains cycle: each peak cracks, with sputter and sizzle around it."""
    half_cycles = np.arange(int(2 * MAINS_HZ * N / SR))
    crack_jitter, crack_size, cycle_size, split_gap, split_size = rng.standard_normal((5, len(half_cycles)))
    snap_s, snap_db = np.transpose(SNAPS)
    snaps = impulses(snap_s, undb(snap_db))
    # a bursting drop displaces ordinary cracks within a half-cycle window
    free = minimum_filter1d(1. * (snaps == 0), int(SR / MAINS_HZ / 2))
    crack_s = (half_cycles + crest + jitter * crack_jitter) / (2 * MAINS_HZ)
    size_db = crack_db + scatter_db * crack_size
    # each crack has a second part, about a millisecond before or after
    split = impulses(crack_s + .0012 * split_gap, undb(size_db + split_db + scatter_db * split_size))
    cracks = impulses(crack_s, undb(size_db)) + split
    cracks = np.minimum(burning * cracks, undb(ceiling_db)) * free
    # small sparks crowd round each crack, stronger in some half cycles
    cycle = rng.integers(0, len(half_cycles), count)
    spark_jitter, spark_size = rng.standard_normal((2, count))
    sputter_s = crack_s[cycle] + .0005 + .0014 * spark_jitter
    spark_db = sputter_db + 7 * np.minimum(spark_size, 2) + 3.5 * np.minimum(cycle_size, 1.5)[cycle]
    sputter = impulses(sputter_s, undb(spark_db))
    current = np.cos(np.pi * (2 * MAINS_HZ * TIME - crest)) ** 2
    sizzle = noise() * current * undb(-7.5 + 0.47 * walk(65))
    kicks = snaps + cracks + burning * (sputter + sizzle)
    return shimmer(flux_cup(convolve(kicks, pulse_shape(SPARK_SPECTRUM))), treble_db)


def flux_cup(x):
    """The rod burns back inside its coating; the growing cup hollows out a wandering treble band."""
    depth = CUP_DEPTH * np.clip((TIME - BURNS[1][0]) / CUP_GROWTH_S, 0, 1) ** .5
    notch_hz = CUP_HZ * (1 + CUP_WANDER * walk(7.9))
    return x - depth * resonate(x, notch_hz, np.full(N, float(CUP_WIDTH_HZ)))


def shimmer(x, treble_db, depth_db=2.5, rate_hz=70, count=13):
    """Each band's level wanders alone; the treble tilts by the amounts set for each burn and flare."""
    centres_hz = np.geomspace(700, 14000, count)
    spectrum = rfft(x, next_fast_len(N + N % 2, True))
    log_bins = np.log(np.linspace(1, SR / 2, len(spectrum)))
    out = 0
    for hz, select in zip(centres_hz, np.eye(count)):
        band = irfft(spectrum * np.interp(log_bins, np.log(centres_hz), select))[:N]
        tilt = np.clip(np.log(hz / 3000) / 2.0, 0, 1)
        out = out + band * undb(depth_db * walk(rate_hz) + treble_db * tilt)
    return out


def plume(burning, puff_db, flutter_db=1.0):
    """Hot gas and smoke flutter above the arc as filtered noise, and swell or dip by the flares' amounts."""
    level_db = PLUME_DB + puff_db + flutter_db * walk(38)
    return unit(colour(noise(), PLUME_SPECTRUM)) * burning * undb(level_db)


def hum(burning, load_db=-55, waver_db=.5):
    """The welder hums at mains harmonics while the arc draws current."""
    load = np.minimum(burning / undb(load_db), 1)
    lines = 0
    for k, db in HUM_LINES:
        lines = lines + undb(db + waver_db * walk(10)) * np.sin(2 * np.pi * k * MAINS_HZ * TIME)
    return load * np.sqrt(2) * lines


def scene():
    """Torch, then welding, over the faint air of the workshop."""
    burning, treble_db, puff_db = arc_state()
    weld = welding(burning, treble_db) + plume(burning, puff_db) + hum(burning)
    return (air() + torch() + spit() + weld)[None]


def record(dry):
    """The microphone rounds loud peaks above the bass; the recorder thins deep bass and cuts the very top."""
    squashed = butter(dry - np.tanh(dry), 2, 500, "high")
    thinned = butter(dry - squashed, 2, 60, "high")
    return signal.sosfiltfilt(signal.ellip(8, .1, 60, TOP_HZ, fs=SR, output="sos"), thinned)


dry = scene()
out = record(dry)
wav_record(out)
```